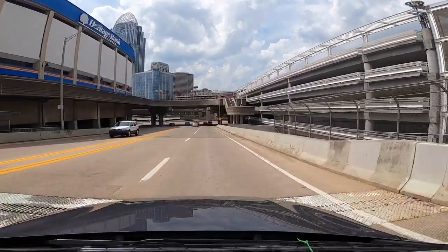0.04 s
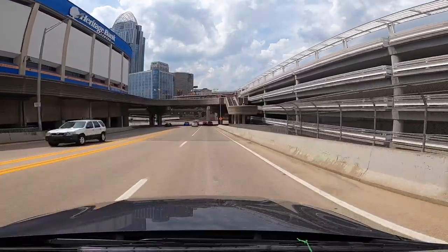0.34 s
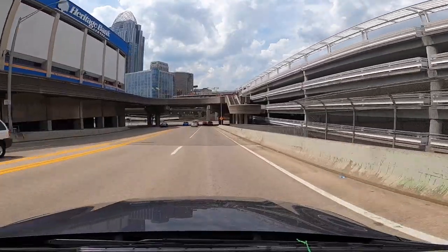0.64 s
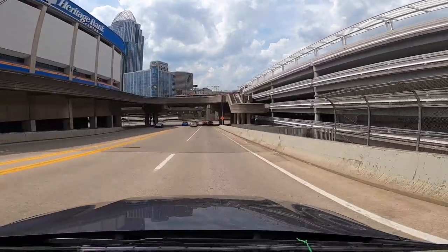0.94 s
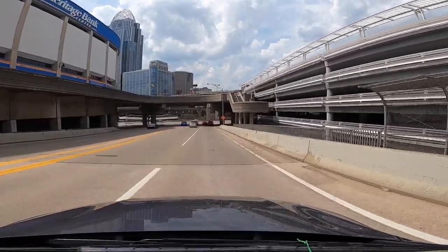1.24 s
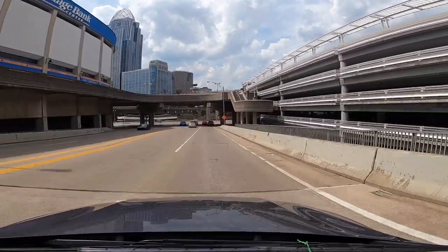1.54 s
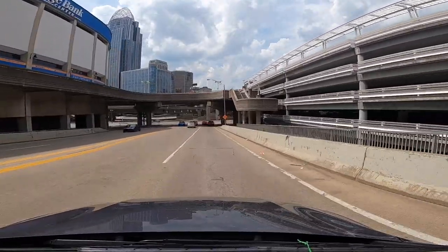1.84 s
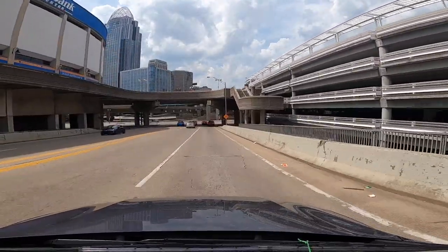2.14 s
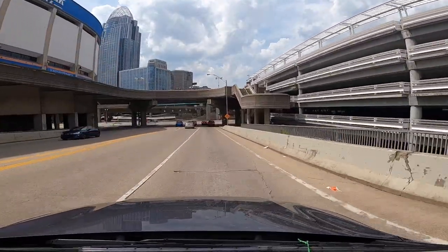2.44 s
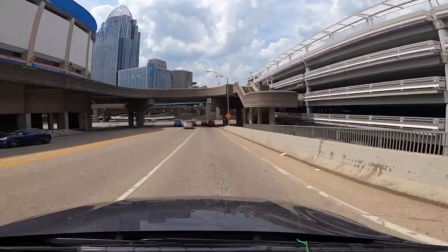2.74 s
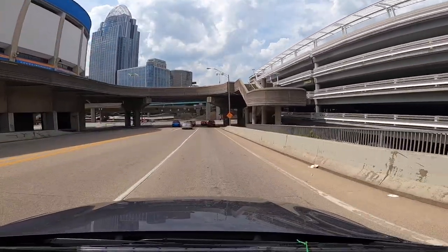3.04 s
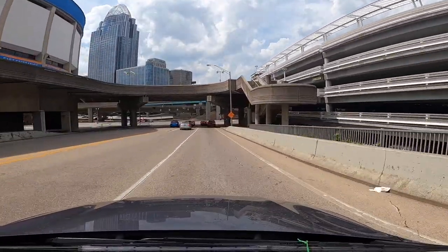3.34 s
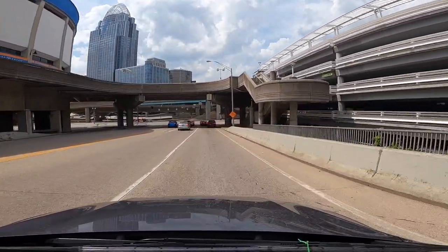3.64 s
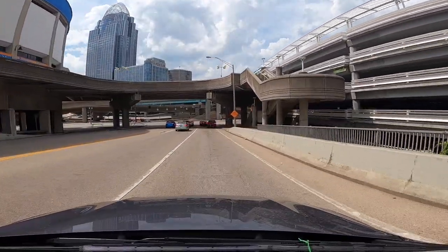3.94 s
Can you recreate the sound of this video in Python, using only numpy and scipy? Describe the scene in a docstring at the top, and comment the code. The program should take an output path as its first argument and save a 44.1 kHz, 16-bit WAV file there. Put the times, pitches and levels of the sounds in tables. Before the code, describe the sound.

A car drives along with wind rumble and tyre roar as two oncoming cars whoosh by.

```python
"""A car drives along a concrete city road, heard from above its bonnet: wind buffets it, the body drones.
Its tyres roar near 1 kHz, sing on the first stretch of paving and hum briefly over patches of it.
Two oncoming cars whoosh by, each coloured by a sweeping reflection, their tread tones falling in pitch.
The wheels bump softly over joints, and a faint engine runs underneath. A limiter evens out the bass."""
import sys
import numpy as np
from scipy import signal
from scipy.fft import rfft, irfft
from scipy.io import wavfile
from scipy.ndimage import uniform_filter1d, map_coordinates

SR = 44100
rng = np.random.default_rng(int(sys.argv[2]) if len(sys.argv) > 2 else 0)


def wav_out(sig):
    """Save sig, one row per channel (or a flat mono array), as 16-bit PCM at SR to the path in sys.argv[1]."""
    wavfile.write(sys.argv[1], SR, np.round(np.clip(np.atleast_2d(sig).T, -1, 1) * 32767).astype(np.int16))


N = 176400
T = np.arange(N) / SR

# oncoming cars: abreast t/s, tread level/dB, tread half length/s, reflection gain,
# trailing hiss level/dB, treble at its brightest/dB
CARS = [(.78, -34.5, 0.3, 0.47, -53.5, 2), (3.2, -35, 0.6, 0.45, -53, -1)]


def from_db(db):
    """Decibels to gain."""
    return 10 ** (np.asarray(db) / 20)


def rms_one(x):
    """Scale to unit rms."""
    return x / np.sqrt(np.mean(x ** 2) + 1e-20)


def in_time(rows):
    """Each column of a breakpoint curve at every sample."""
    times, *columns = np.transpose(rows)
    return [np.interp(T, times, column) for column in columns]


def swell(peak_s, half_s):
    """Bell-shaped envelope that peaks at 1."""
    return np.exp(-((T - peak_s) / half_s) ** 2)


def drift(rate_hz):
    """Smooth random wander of spread 1."""
    step, settle = 20, 4000  # samples per control step, steps for the filter to settle
    pole = np.exp(-2 * np.pi * step * rate_hz / SR)
    white = rng.standard_normal(N // step + settle + 2)
    slow = signal.lfilter([1], [1, -2 * pole, pole * pole], white)[settle:]
    return np.interp(np.arange(N) / step, np.arange(len(slow)), rms_one(slow))


def coloured_noise(spectrum, flutter_db):
    """Noise of the given spectral shape whose overlapping octaves each flutter in level; rms 1."""
    hz, db = np.transpose(spectrum)
    octave = np.log2(np.maximum(np.arange(N // 2 + 1) * SR / N, 1))
    points = np.log2(hz)
    outside = np.abs(octave - np.clip(octave, points[0], points[-1]))
    shape_db = np.interp(octave, points, db) - 18 * outside  # 18 dB per octave off either end
    shaped = rfft(rng.standard_normal(N)) * from_db(shape_db)
    bands = (irfft(shaped * np.maximum(1 - np.abs(octave - centre), 0), N) for centre in range(3, 16))
    return rms_one(sum(band * from_db(flutter_db * drift(6.6)) for band in bands))


def low_pass(x, hz):
    """Take off the treble without delay."""
    return signal.sosfiltfilt(signal.butter(2, hz, fs=SR, output="sos"), x)


def narrow_noise(hz, width_hz):
    """A noisy resonance that follows a pitch curve; rms 1."""
    phase = 2 * np.pi * np.cumsum(hz) / SR
    return drift(width_hz) * np.cos(phase) + drift(width_hz) * np.sin(phase)


def rumble():
    """Air buffets the car steadily while the drone of its body rises and falls over the road."""
    # wind and body rumble spectrum: f/Hz, level/dB
    buffet_spectrum = [(14, -1), (25, -2.5), (42, 1), (62, -2), (100, -2.5), (150, -9.5), (200, -12),
                       (300, -19), (450, -24), (700, -30), (1500, -46)]
    # body drone spectrum: f/Hz, level/dB
    drone_spectrum = [(80, -9), (120, 2.5), (180, -1.5), (240, -2), (320, -8), (440, -10.5), (640, -20.5)]
    # body drone envelope: t/s, level/dB
    drone_envelope = [(0, -28.5), (.4, -25), (.62, -26.5), (1.0, -30), (1.4, -26.5), (1.75, -31),
                      (1.95, -27), (2.25, -24.5), (2.5, -28), (2.9, -26), (3.25, -21), (3.5, -29.5),
                      (4, -41.5)]
    drone_db, = in_time(drone_envelope)
    buffet = from_db(-18.5) * coloured_noise(buffet_spectrum, flutter_db=0)
    return buffet + from_db(drone_db) * coloured_noise(drone_spectrum, flutter_db=0.2)


def tyres():
    """Tread on concrete: a broad roar, fine surface hiss, and a narrow song in a wider skirt."""
    # tread roar spectrum: f/Hz, level/dB
    roar_spectrum = [(200, 0), (450, -3), (700, -0.5), (880, 3), (1080, 0), (1350, -5.5), (2000, -13.5),
                     (2800, -20), (3800, -27.5), (5200, -37.5), (7200, -41), (9000, -51.5), (11000, -58),
                     (14000, -71)]
    # roar gain as the paving changes: t/s, level/dB
    paving = [(0, 0), (.25, 2), (.6, 3.5), (1.0, 4), (1.25, 1.5), (1.55, 1), (1.75, 1), (1.97, -2),
              (2.05, 0.5), (2.4, -0.5), (2.8, -1.5), (3.3, -4), (3.6, 3.5), (4, 1)]
    # road surface hiss spectrum: f/Hz, level/dB
    hiss_spectrum = [(1500, -0.5), (3300, 6), (5000, -1), (6500, -5.5), (7600, -10), (8800, -9),
                     (10000, -17.5), (12000, -31), (14500, -31.5)]
    # hiss envelope: t/s, level/dB
    hiss_envelope = [(0, -53), (.24, -57.5), (.35, -56), (.45, -52.5), (.85, -49.5), (1.2, -53),
                     (1.55, -52), (1.7, -54), (1.97, -59), (2.04, -53), (2.25, -55.5), (2.5, -53),
                     (3.1, -49.5), (3.5, -54.5), (3.65, -62), (4, -59)]
    # tyre song: t/s, f/Hz, level/dB
    song_curve = [(0, 1046, -43), (.3, 1047, -37), (.48, 1045, -39), (.68, 1058, -38.5), (.82, 1058, -37),
                  (1.0, 1031, -41), (1.25, 995, -39.5), (1.8, 991.5, -60.5), (2.6, 1007, -44.5),
                  (3.5, 1001, -50), (3.8, 1002, -49), (4, 980, -38)]
    paving_db, = in_time(paving)
    hiss_db, = in_time(hiss_envelope)
    song_hz, song_db = in_time(song_curve)
    roar = from_db(-34 + paving_db) * coloured_noise(roar_spectrum, flutter_db=0.4)
    hiss = from_db(hiss_db) * coloured_noise(hiss_spectrum, flutter_db=1.6)
    song = narrow_noise(song_hz, width_hz=64)
    skirt = from_db(1.5) * narrow_noise(song_hz, width_hz=87)
    return roar + hiss + from_db(song_db) * (song + skirt)


def tyre_hums():
    """Short tones swell and fade as the tyres cross patches of paving."""
    # hums and whines: t/s, f/Hz, level/dB, half length/s
    hums = [(0.329, 408, -28, 0.034), (.48, 1044, -26.5, 0.029), (0.656, 1056, -27, 0.041),
            (0.964, 1043, -34, 0.088), (1.117, 1025, -38, .05), (3.11, 345.8, -31, 0.098),
            (3.87, 252.2, -25.5, 0.11), (3.964, 948, -33.5, 0.066)]
    out = 0
    for peak_s, hz, db, half_s in hums:
        wavering_hz = hz * (1 + 0.0075 * drift(14.5))
        phase = 2 * np.pi * np.cumsum(wavering_hz) / SR
        out += from_db(db) * swell(peak_s, half_s) * rms_one(np.sin(phase))
    return out


def oncoming_whoosh():
    """Each car swells, brightens and fades; its reflection's lag shrinks, sweeping the colour upward."""
    # pass-bys, one curve per car: t/s, level/dB, reflection lag/ms
    passes = [
        [(0, -38, 0.28), (.38, -34.5, .23), (.52, -31, 0.18), (.62, -31, .15), (.71, -29, 0.13),
         (.76, -32, 0.1), (.8, -33.5, 0.093), (.85, -29.5, 0.16), (.95, -43, 0.066), (1.15, -48, 0.074)],
        [(2.4, -40, 0.24), (2.68, -31, 0.2), (2.88, -29.5, 0.16), (3.0, -29, 0.11), (3.11, -29, .1),
         (3.155, -30, 0.066), (3.21, -29, 0.09), (3.33, -31, 0.075), (3.6, -33.5, .063), (4, -35, 0.048)],
    ]
    # whoosh spectrum: f/Hz, level/dB
    whoosh_spectrum = [(150, -9), (400, 2), (600, -1.5), (800, -3), (1050, 3), (1350, -1.5), (2000, -6.5),
                       (2800, -14), (3800, -14.5), (5200, -21.5), (7200, -32), (8800, -30.5),
                       (10000, -34.5), (12000, -47.5), (14500, -64)]
    brightest_lead_s, dulling_db_per_s, fade_s = 0.19, 9.5, 0.41
    out = 0
    for curve, (abreast_s, _, _, reflection_gain, _, treble_db) in zip(passes, CARS):
        db, lag_ms = in_time(curve)
        whoosh = coloured_noise(whoosh_spectrum, flutter_db=0.5)
        body = low_pass(whoosh, hz=6500)
        dulling_db = dulling_db_per_s * np.abs(T - abreast_s + brightest_lead_s)
        direct = body + (whoosh - body) * from_db(treble_db - dulling_db)
        read_at = (T - lag_ms / 1000) * SR
        reflection = map_coordinates(low_pass(direct, hz=8800), [read_at], order=3, mode="wrap")
        combed = (direct + reflection_gain * reflection) / (1 + reflection_gain)
        beyond_curve_s = np.abs(T - np.clip(T, curve[0][0], curve[-1][0]))
        out += from_db(db) * np.exp(-beyond_curve_s / fade_s) * combed
    return out


def oncoming_tyres():
    """Each car's tread tone drops in a Doppler glide as it goes by; a short hiss trails behind."""
    # trailing hiss spectrum: f/Hz, level/dB
    wake_spectrum = [(2400, 5), (3600, 2), (4600, 5), (6000, -22)]
    tread_hz, doppler_shift, glide_s = 1035, 0.08, 0.21
    soften = signal.butter(2, 2 * tread_hz, fs=SR, output="sos")
    out = 0
    for abreast_s, tread_db, half_s, _, wake_db, _ in CARS:
        age = T - abreast_s
        hz = tread_hz * (1 - doppler_shift * np.tanh(age / glide_s))
        tread = signal.sosfilt(soften, narrow_noise(hz, width_hz=128))
        wake = swell(abreast_s + 0.08, half_s=0.13) * coloured_noise(wake_spectrum, flutter_db=4)
        out += from_db(tread_db) * tread / np.hypot(1, (age / half_s) ** 2) + from_db(wake_db) * wake
    return out


def roar_surges():
    """The roar swells briefly in one band or another as the cars go by."""
    # noise swells: t/s, centre f/Hz, width/octaves, level/dB, half length/s
    surges = [(0.223, 3960, .45, -52.5, 0.1), (0.607, 1880, 0.46, -40, 0.049), (.8, 730, 0.98, -32, 0.25),
              (.78, 1147, 0.21, -30, 0.042), (0.797, 1480, 0.99, -34.5, 0.026),
              (2.83, 468.5, 0.54, -30, 0.035), (3.149, 1790, 0.62, -36.5, 0.034),
              (3.25, 2900, 0.68, -46.5, 0.16), (3.248, 720, 0.42, -32, .03),
              (3.92, 1043, 0.24, -36.5, 0.12)]
    out = 0
    for peak_s, hz, octaves, db, half_s in surges:
        edges_hz = [hz * 2 ** (-octaves / 2), hz * 2 ** (octaves / 2)]
        band = signal.butter(2, edges_hz, "band", fs=SR, output="sos")
        noise = rms_one(signal.sosfilt(band, rng.standard_normal(N)))
        out += from_db(db) * swell(peak_s, half_s) * noise
    return out


def joint_bumps():
    """The wheels cross road joints: soft bumps that rise quickly and die away."""
    # road joints: t/s, level/dB
    joints = [(1.44, -27.5), (1.93, -23), (2.02, -25.5)]
    # bump spectrum: f/Hz, level/dB
    bump_spectrum = [(30, 4), (90, 4.5), (300, -1.5), (600, -22), (950, -4), (1500, -19), (4000, -41),
                     (9000, -60), (14000, -80)]
    rise_s = 0.013
    envelope = 0
    for start_s, db in joints:
        age = np.maximum(T - start_s, 0) / rise_s
        envelope += from_db(db) * age * np.exp(1 - age)
    return envelope * coloured_noise(bump_spectrum, flutter_db=4.5)


def engine():
    """Low orders of a cruising engine, wandering together in pitch and separately in level."""
    # engine gain: t/s, level/dB
    load = [(0, 0.5), (1.4, 4), (2.0, 3), (2.8, -6.5), (3.3, 3.5), (4, 1.5)]
    # engine orders: multiple of the fundamental, level/dB
    orders = [(1, -30.5), (2, -30.5), (4, -37), (6, -47), (7, -44), (8, -54.5)]
    fundamental_hz = 43.79 * (1 + 0.02215 * drift(2.868))
    phase = 2 * np.pi * np.cumsum(fundamental_hz) / SR
    load_db, = in_time(load)
    out = 0
    for order, db in orders:
        waver = 1 + 0.34 * drift(2.53)
        out += from_db(db) * rms_one(waver * np.sin(order * phase + rng.uniform(0, 2 * np.pi)))
    return from_db(load_db) * out


def scene():
    """The car and the oncoming traffic, mixed to mono."""
    car = rumble() + engine() + tyres()
    traffic = oncoming_whoosh() + oncoming_tyres() + roar_surges()
    return (car + traffic + tyre_hums() + joint_bumps())[None]


def record(dry):
    """A fast limiter evens out the bass, peaks are rounded off and the top is cut."""
    bass_limit, react_s, peak_limit = 0.14, 0.027, 0.43
    fade_in_s, cutoff_hz = 0.004, 14900
    bass = low_pass(dry, hz=129)
    bass_power = uniform_filter1d(bass ** 2, int(react_s * SR))
    held = dry - bass + bass / (1 + (bass_power / bass_limit ** 2) ** 2) ** 0.25
    rounded = held / (1 + (held / peak_limit) ** 4) ** 0.25
    faded = rounded * np.minimum(T / fade_in_s, 1)
    return signal.sosfilt(signal.cheby2(12, 70, cutoff_hz, fs=SR, output="sos"), faded)


dry = scene()
out = record(dry)
wav_out(out)
```